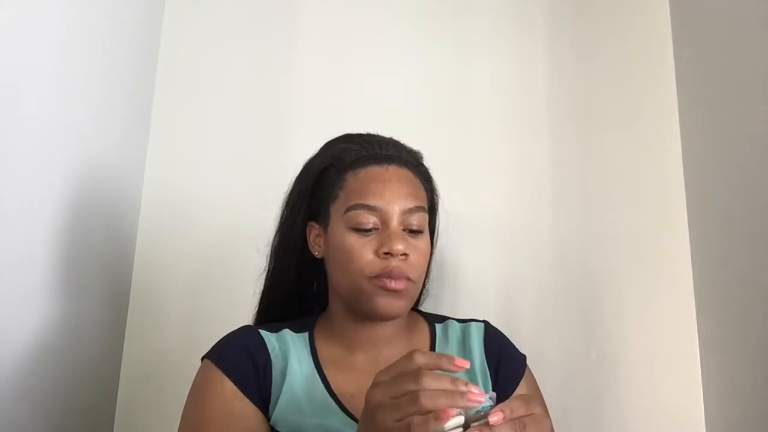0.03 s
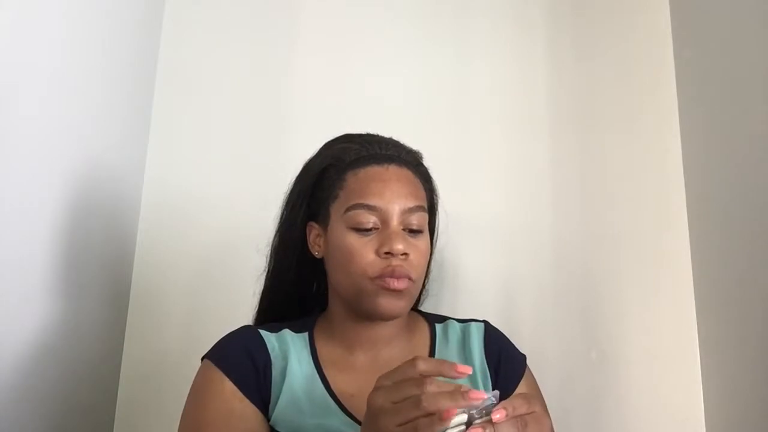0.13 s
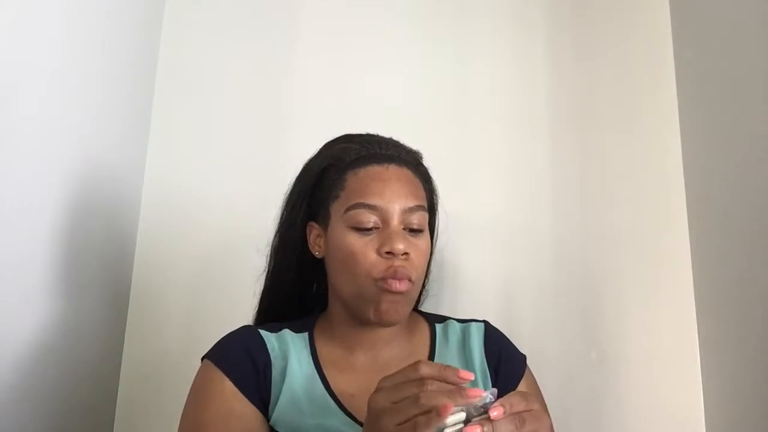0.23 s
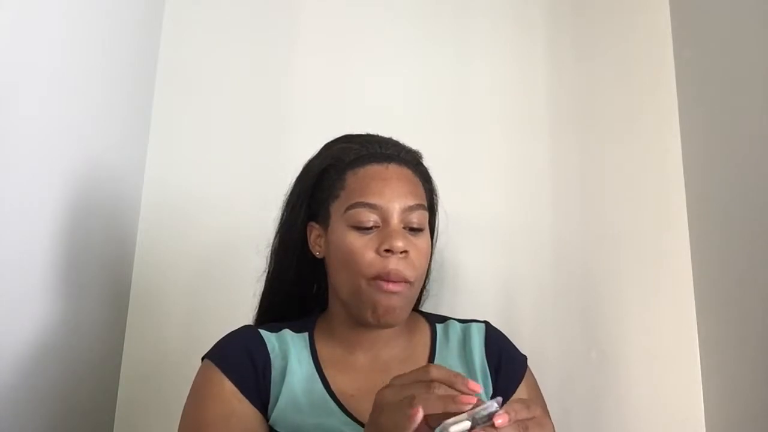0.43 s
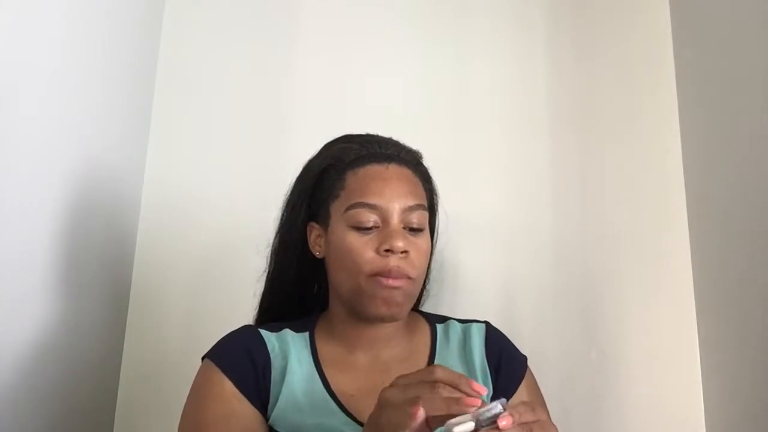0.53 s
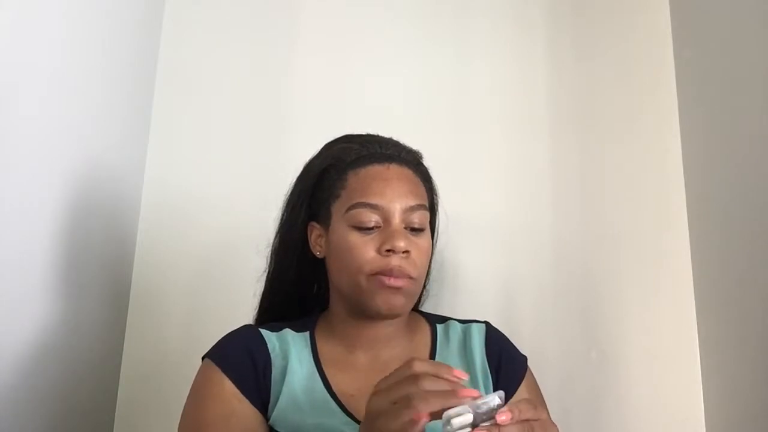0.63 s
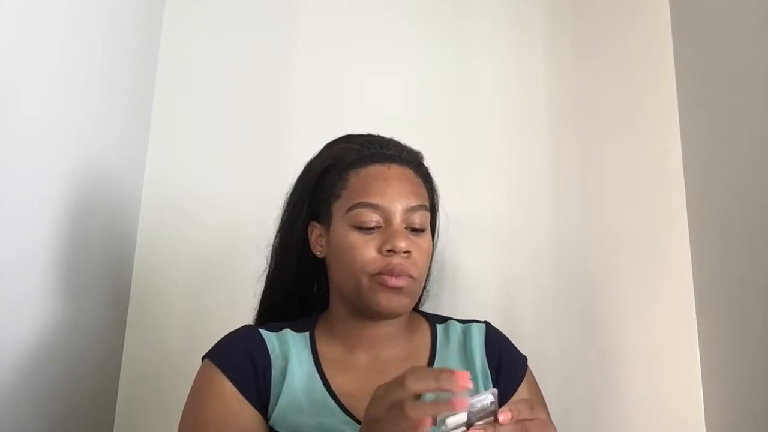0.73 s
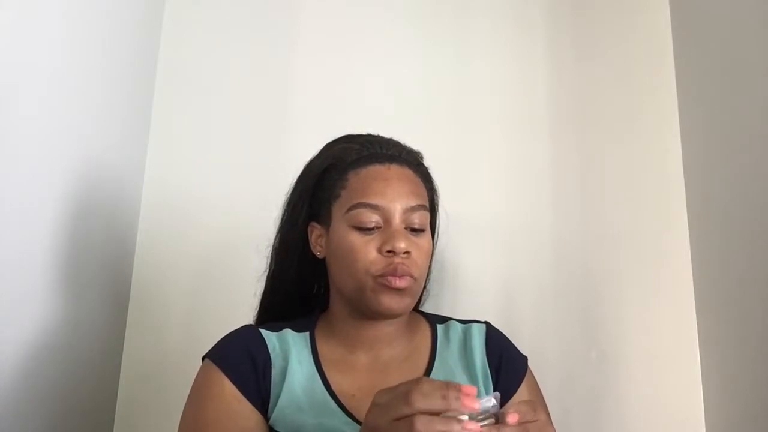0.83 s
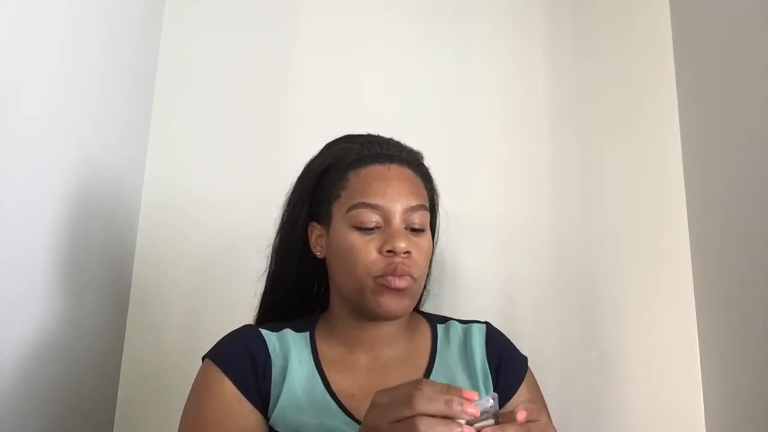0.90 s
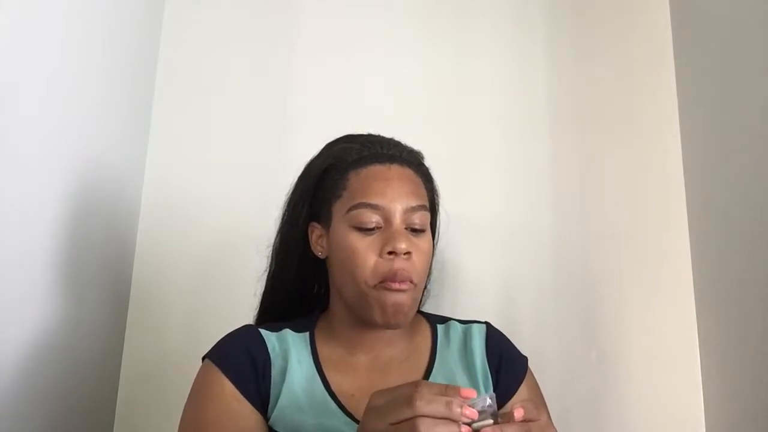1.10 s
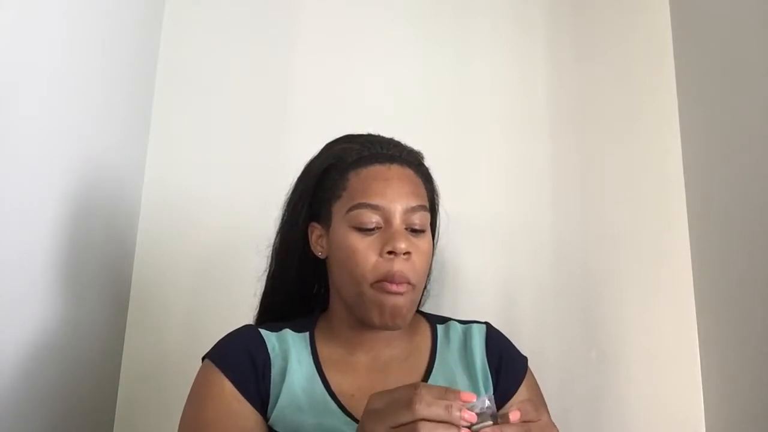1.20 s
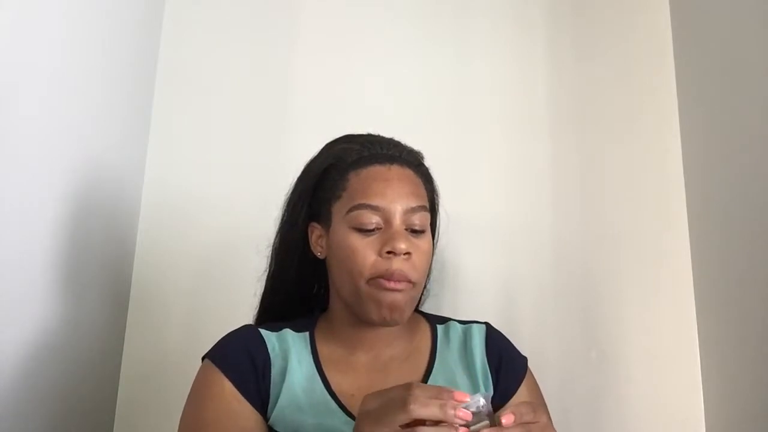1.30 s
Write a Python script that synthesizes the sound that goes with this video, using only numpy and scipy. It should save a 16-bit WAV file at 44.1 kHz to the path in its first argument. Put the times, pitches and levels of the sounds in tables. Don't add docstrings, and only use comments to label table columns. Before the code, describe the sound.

A blister pack buckles in fingers: quick crackles build to two sharp snaps, then a pause, a softer crackle and small late ticks. Small hard-walled room, close built-in microphone, low rumble and faint hiss beneath.

```python
import sys
import numpy as np
from scipy import signal
from scipy.fft import rfft, irfft
from scipy.io import wavfile
from scipy.ndimage import uniform_filter1d

SR = 44100
rng = np.random.default_rng(int(sys.argv[2]) if len(sys.argv) > 2 else 0)


def transcribe(signal):
    frames = np.atleast_2d(signal).T
    limited = np.clip(frames, -1, 1)
    pcm = np.round(limited * 32767).astype(np.int16)
    wavfile.write(sys.argv[1], SR, pcm)


def invert_db(x):
    u = np.asarray(x, float) / 20
    return 10 ** u


N = 59535

# (frequency [Hz], density [dB per Hz])
ROOM_NOISE = [(42, -4), (120, -4.5), (330, -6), (480, -23.5), (800, -22), (4500, -31.5), (13000, -40.5),
              (15500, -35)]
# (frequency [Hz], level [dB rms], width [Hz])
MACHINE_HUMS = [(239.3, -65.5, 12), (117.2, -66.5, 21.5), (203.6, -78.5, 3.4)]
# (time [s], level [dB])
RUB_LEVEL = [(0, -65.5), (.09, -86), (.13, -66), (.3, -47), (.5, -84.5), (.6, -101), (.66, -67), (.82, -77),
             (.95, -85), (1.0, -73), (1.2, -78), (1.3, -100), (1.35, -59.5)]
# (time [s], peak [dB], burst length [ms], broad crack against the modes [dB])
SNAPS = [
    (0.1379, -31.5, 2.4, -6),
    (0.1976, -24.5, 1.6, -8),
    (0.2077, -22.5, 3.2, 4),
    (.2291, -10, 0.26, -10.5),
    (0.2904, -15, 0.47, -6),
    (0.3547, -24, 1.93, -17.5),
    (0.6728, -20.5, 3.1, 2),
    (1.025, -25.5, 3.9, -3.5),
]
# (frequency [Hz], width [Hz], level [dB])
SHEET_1 = [(1100, 77, -17.5), (1830, 67, -18), (4640, 520, -28.5), (5500, 440, -3), (7120, 110, -2.5),
           (9460, 810, -6.5), (11650, 590, -3.5), (13600, 300, -16)]
SHEET_2 = [(3700, 600, -3), (6100, 400, -7), (7300, 700, -10), (10600, 500, -5), (12100, 500, -5),
           (14500, 500, -9)]
SHEET_3 = [(1420, 450, -1), (3400, 230, -30), (6000, 940, 6), (7560, 150, 6.5), (9780, 390, -3),
           (12630, 240, 7.5), (14400, 140, -7)]
SHEET_4 = [(2290, 1200, -14), (3520, 200, -7.5), (3840, 190, -0.5), (4730, 330, 0.5), (5420, 550, 5.5),
           (9120, 760, -2), (10130, 620, -5.5), (11140, 650, 2), (12500, 800, 0), (14300, 860, -11.5)]
SHEET_5 = [(3400, 230, -27), (4540, 310, -18), (6020, 350, -5), (7980, 710, 5), (9630, 710, -2.5),
           (11900, 490, -2.5), (12800, 660, 2.5), (13700, 490, -15.5)]
SHEET_6 = [(1125, 53, -20), (1848, 360, -8.5), (2080, 106, -6), (3696, 91, -1.5), (4900, 450, -3.5),
           (5660, 440, -4), (6310, 150, -0.5), (7360, 590, -1.5), (11000, 800, -7), (13000, 540, -9)]
SHEET_7 = [(1474, 34, -6.5), (2820, 130, 2), (4300, 190, -8), (6300, 700, 5.5), (8700, 3300, 8),
           (11420, 300, 11), (12500, 180, 9), (13050, 160, -3)]
SHEET_8 = [(950, 84, -14.5), (2610, 450, -5), (3260, 360, 0.5), (4800, 250, 2.5), (6540, 240, 1.5),
           (7940, 1100, 1.5), (9480, 870, -11.5), (11070, 680, -3), (12700, 690, -9.5)]
# (time [s], peak [dB], main pitch [Hz], burst length [ms], broad crack against the modes [dB])
TICKS = [(0.016, -49.5, 8700, 1.2, 11), (0.1165, -43, 5500, 1.3, 12), (0.136, -40, 6000, 2.2, -1),
         (0.1712, -41.5, 4330, 7.4, -33), (.1845, -64, 4900, 1.2, -6), (0.5593, -51.5, 8500, 3.1, 2),
         (0.611, -51.5, 9200, 1.6, -1), (0.619, -42.5, 3160, 4.4, -6), (0.6296, -37, 3350, 3.2, -6.5),
         (.639, -40.5, 3400, 1.2, -8), (0.664, -39.5, 10600, 34, 1), (0.837, -45, 3270, 3.6, -5.5),
         (0.844, -52, 5200, 6.3, -21), (0.877, -44.5, 5500, 12, -22), (0.8861, -28.5, 2110, 0.12, 9.5),
         (0.9246, -39.5, 7440, 6.5, 4), (1.0066, -41, 9300, 5.7, 17), (1.0373, -27.5, 3330, 3.5, 6),
         (1.047, -37, 3430, 2, -11), (1.216, -43, 2300, 2.1, -9), (1.217, -45.5, 4920, 0.54, -28),
         (.896, -41, 3600, 1.7, -25), (1.3192, -47.5, 1960, 0.12, -6), (1.342, -59, 8950, 5, 3)]
# (delay [ms], level [dB], smear [ms])
ECHOES = [(1.697, -6.5, 0.34), (5.703, -11.5, 0.3), (8.52, -21, 0.41), (9.45, -8.5, 0.052),
          (10.46, -10, 0.16), (13.4, -7, 0.15), (21.97, -19.5, 1.6), (31.6, -32, 0.44), (39.6, -19.5, 0.43),
          (43.8, -29, .6), (53, -26, 0.53)]
# (frequency [Hz], time to fall 60 dB [s])
TAIL_T60 = [(1000, 0.46), (3000, 0.29), (7000, 0.28), (15000, 0.25)]
# (frequency [Hz], level [dB])
TAIL_COLOUR = [(1000, -0.5), (3000, -5), (7000, 0.5), (15000, -1)]

FLOOR_DB = -56.5
FAN_HZ, FAN_DB = 47, -60
RUB_GRAINS_PER_S, RUB_SPREAD_DB, RUB_LOW_HZ = 950, 4, 3040
CRACK_LOW_HZ, CRACK_HIGH_HZ = 2800, 14500
FIRST_SLIP_DB, SLIP_SPREAD_DB = 17, 3.5
BURST_EDGE, SLIP_EVEN_HZ = 4.0, 500
SHEET_DAMPING, LEAST_WIDTH_SHARE = 1.49, 0.045
SNAP_TRIM_DB, TICK_TRIM_DB = 0.3, -1.4
TICK_WIDTH_SHARE, OVERTONE, OVERTONE_DB = 0.1, 1.65, -7
SCATTER_MS, SCATTER_DB, SCATTER_FADE_MS = 5.0, -11, 7.0
ECHO_LOW_HZ, ECHO_LOW_SHARE = 2570, 0.64
TAIL_DB, TAIL_RISE_MS = -30, 7.0
MIC_DIP_HZ, MIC_DIP_WIDTH_HZ, MIC_DIP_SHARE = 7300, 600, 0.4
LOW_CUT_HZ, CUTOFF_HZ, ABOVE_CUT_DB = 40, 15250, -33


def rms_one(x):
    return x / np.sqrt(np.mean(x ** 2) + 1e-20)


def at_hz(points, hz):
    table_hz, values = np.transpose(points)
    return np.interp(np.log(hz), np.log(table_hz), values)


def band(x, low_hz, high_hz):
    edges_hz = [low_hz, min(high_hz, SR / 2.2)]
    return signal.sosfilt(signal.butter(2, edges_hz, "band", fs=SR, output="sos"), x)


def resonate(x, hz, width_hz):
    r = np.exp(-np.pi * width_hz / SR)
    zeros = np.array([1, 0, -1]) * (1 - r * r) / 2
    poles = [1, -2 * r * np.cos(2 * np.pi * hz / SR), r * r]
    return signal.lfilter(zeros, poles, x)


def background():
    white = rng.standard_normal((3, N + SR))
    edges = 36 * 2 ** np.arange(0, 9, 1 / 3)
    noise = np.zeros(N + SR)
    for k, (low, high) in enumerate(zip(edges, edges[1:])):
        noise += invert_db(at_hz(ROOM_NOISE, np.sqrt(low * high))) * band(white[k % 2], low, high)
    hums = np.zeros(N)
    for hz, db, width_hz in MACHINE_HUMS:
        hum = resonate(resonate(white[2], hz, width_hz), hz, width_hz)
        hums += invert_db(db) * rms_one(hum[SR:])
    fan = invert_db(FAN_DB) * np.sqrt(2) * np.sin(2 * np.pi * FAN_HZ * np.arange(N) / SR)
    return invert_db(FLOOR_DB) * rms_one(noise[SR:]) + hums + fan


def rub():
    s, db = np.transpose(RUB_LEVEL)
    sizes = invert_db(RUB_SPREAD_DB * np.minimum(rng.exponential(1, N), 4)) * rng.choice([-1, 1], N)
    grains = sizes * (rng.random(N) < RUB_GRAINS_PER_S / SR)
    level = invert_db(np.interp(np.arange(N) / SR, s, db))
    return level * rms_one(band(grains, RUB_LOW_HZ, CRACK_HIGH_HZ))


def even(x, width_hz):
    spectrum = rfft(x)
    mean_power = uniform_filter1d(np.abs(spectrum) ** 2, size=int(width_hz * x.size / SR))
    levelled = irfft(spectrum / np.sqrt(mean_power), x.size) * np.sqrt(np.sum(x ** 2))
    return levelled * (np.arange(x.size) < 0.75 * x.size)


def mode(x, hz, width_hz):
    return rms_one(resonate(resonate(x, hz, width_hz), hz, 3 * width_hz))


def buckle(peak_db, burst_ms, crack_db, modes):
    ms = np.arange(1200) * 1000 / SR
    sizes = invert_db(SLIP_SPREAD_DB * np.minimum(rng.exponential(1, ms.size), 4))
    slips = sizes * rng.choice([-1, 1], ms.size)
    slips[0] = invert_db(FIRST_SLIP_DB)
    burst = slips / (1 + (ms / max(burst_ms, 0.05)) ** BURST_EDGE)
    slips = even(burst, SLIP_EVEN_HZ)
    rings = np.zeros(ms.size)
    for hz, width_hz, db in modes:
        rings += invert_db(db) * mode(slips, hz, max(width_hz * SHEET_DAMPING, hz * LEAST_WIDTH_SHARE))
    crack = band(band(slips, CRACK_LOW_HZ, CRACK_HIGH_HZ), 0.72 * CRACK_LOW_HZ, SR)
    sound = rms_one(rings) + invert_db(crack_db) * rms_one(crack)
    return invert_db(peak_db) * sound / np.abs(sound).max()


def add(out, s, x):
    i = int(s * SR)
    out[i:i + len(x)] += x


def pack():
    out = np.zeros(N + SR)
    sheets = [SHEET_1, SHEET_2, SHEET_3, SHEET_4, SHEET_5, SHEET_6, SHEET_7, SHEET_8]
    for (s, db, ms, crack_db), modes in zip(SNAPS, sheets):
        add(out, s, buckle(db + SNAP_TRIM_DB, ms, crack_db, modes))
    for s, db, hz, ms, crack_db in TICKS:
        width_hz = hz * TICK_WIDTH_SHARE
        overtone_hz = min(hz * OVERTONE, CRACK_HIGH_HZ)
        modes = [(hz, width_hz, 0), (overtone_hz, width_hz, OVERTONE_DB)]
        add(out, s, buckle(db + TICK_TRIM_DB, ms, crack_db, modes))
    return out[:N]


def room(x):
    t = np.arange(SR // 2) / SR
    white = rng.standard_normal((3, t.size))
    response = (t == 0) * 1.0
    for ms, db, smear_ms in list(ECHOES) + [(SCATTER_MS, SCATTER_DB, SCATTER_FADE_MS)]:
        puff = white[2] * (t * 1000 >= ms) * np.exp(-np.maximum(t * 1000 - ms, 0) / smear_ms)
        puff = puff / np.sqrt(np.sum(puff ** 2))
        delay = int(ms * SR / 1000)
        response = response + invert_db(db) * np.roll(even(np.roll(puff, -delay), 900), delay)
    bright = band(response[1:], ECHO_LOW_HZ, SR)
    response[1:] = ECHO_LOW_SHARE * response[1:] + (1 - ECHO_LOW_SHARE) * bright
    edges = 700 * 2 ** np.arange(0, 5, 0.5)
    rise = 1 - np.exp(-t * 1000 / TAIL_RISE_MS)
    for k, (low, high) in enumerate(zip(edges, edges[1:])):
        hz = np.sqrt(low * high)
        fall = invert_db(TAIL_DB + at_hz(TAIL_COLOUR, hz) - 60 * t / at_hz(TAIL_T60, hz))
        response = response + fall * rise * band(white[k % 2], low, high)
    return signal.fftconvolve(x, response)[:N]


def scene():
    return (room(pack() + rub()) + background())[None]


def low_pass(x):
    return signal.sosfilt(signal.butter(12, 16470, fs=SR, output="sos"), x)


def record(dry):
    x = dry - MIC_DIP_SHARE * resonate(dry, MIC_DIP_HZ, MIC_DIP_WIDTH_HZ)
    x = signal.sosfilt(signal.butter(2, LOW_CUT_HZ, "high", fs=SR, output="sos"), x)
    below_cut = signal.sosfilt(signal.cheby1(12, 1, CUTOFF_HZ, fs=SR, output="sos"), x)
    mix = below_cut + invert_db(ABOVE_CUT_DB) * x
    return low_pass(mix)


dry = scene()
out = record(dry)
transcribe(out)
```